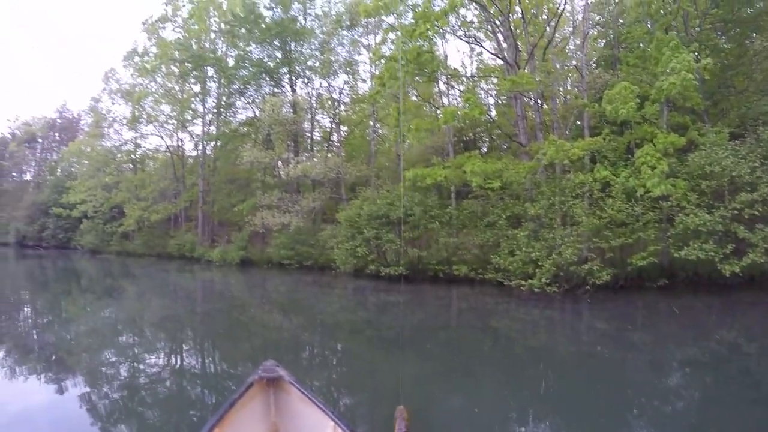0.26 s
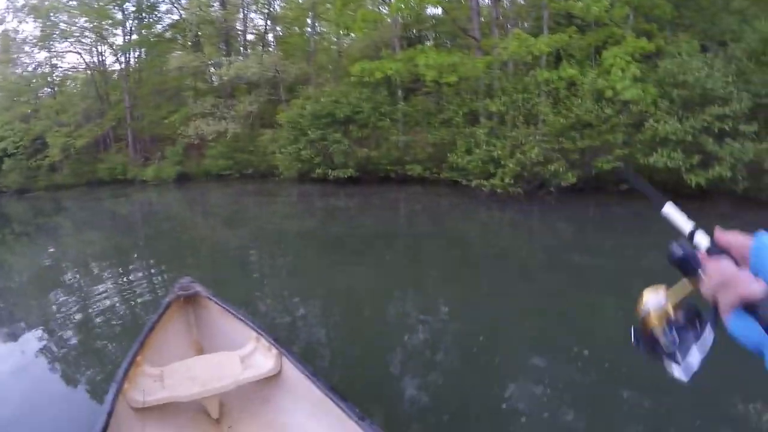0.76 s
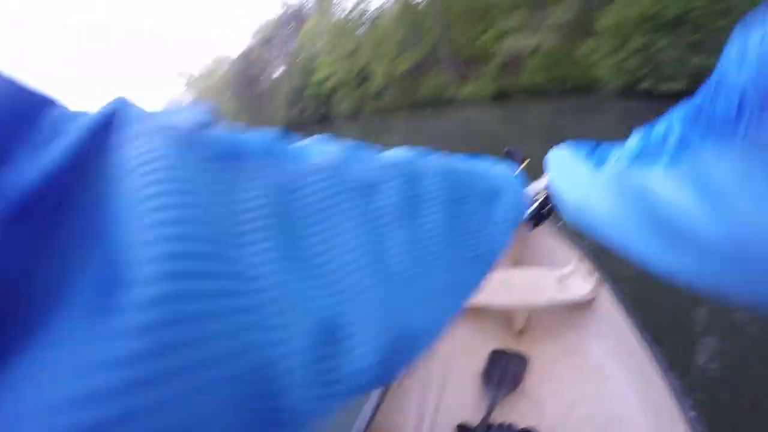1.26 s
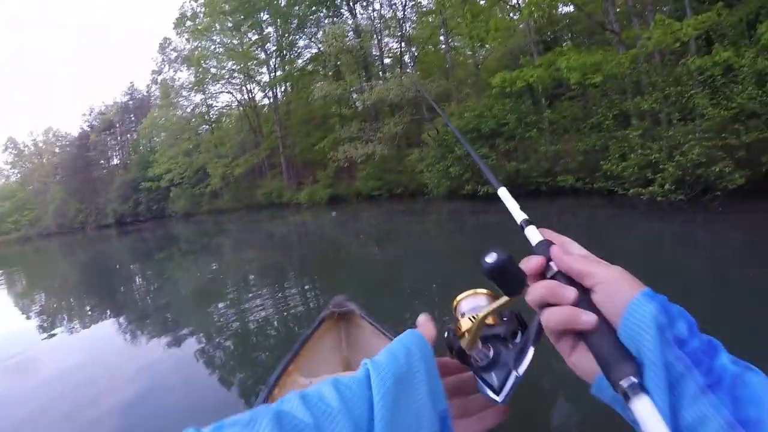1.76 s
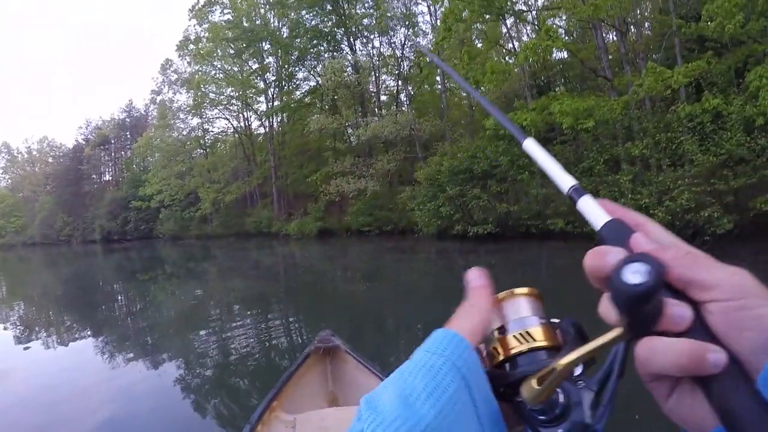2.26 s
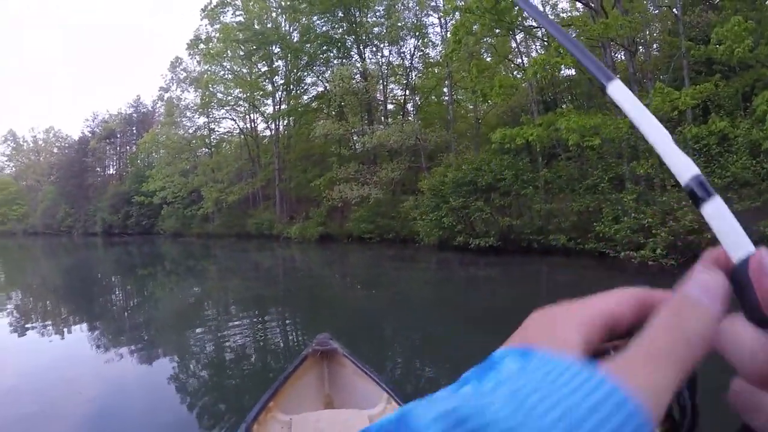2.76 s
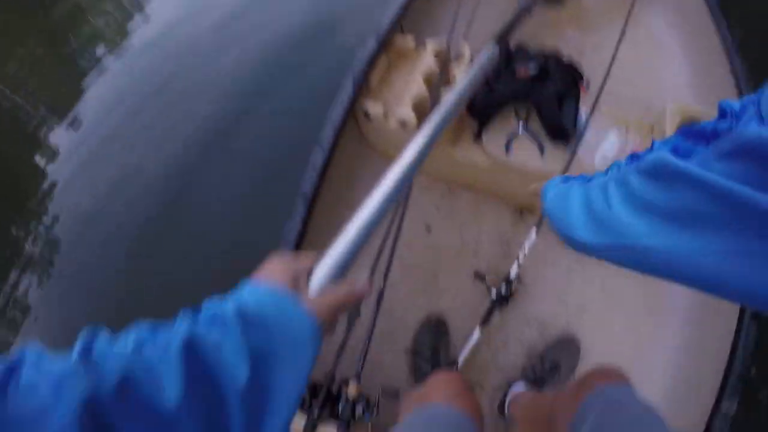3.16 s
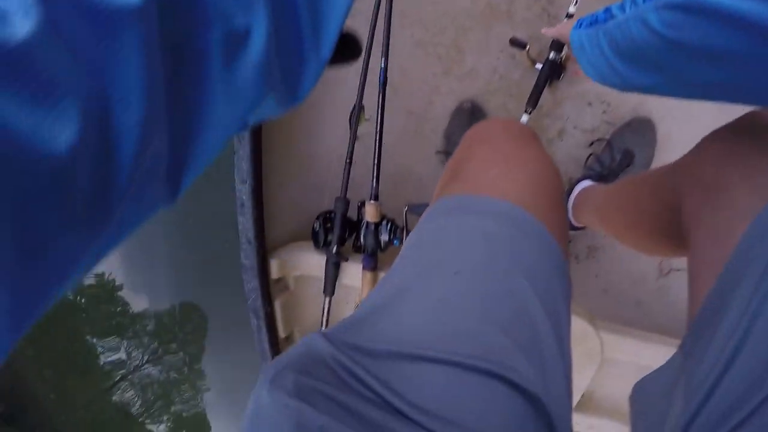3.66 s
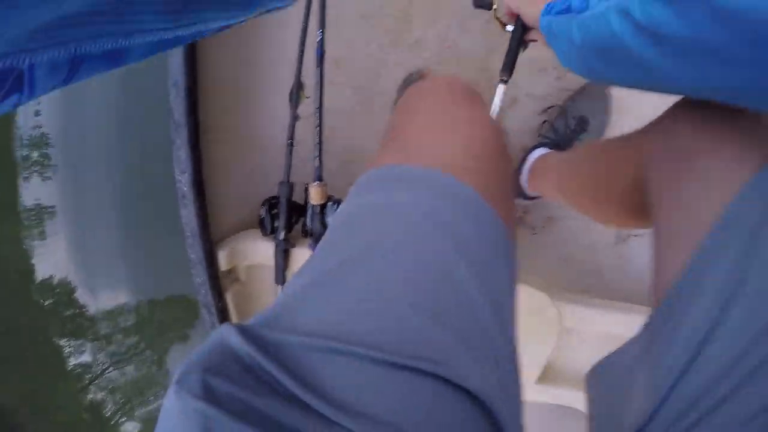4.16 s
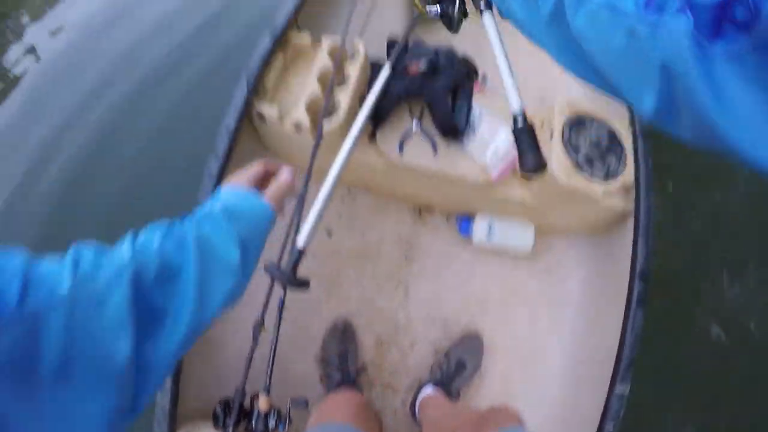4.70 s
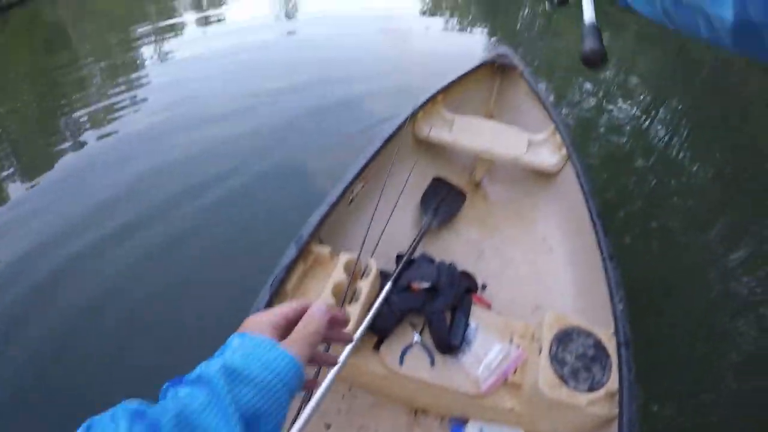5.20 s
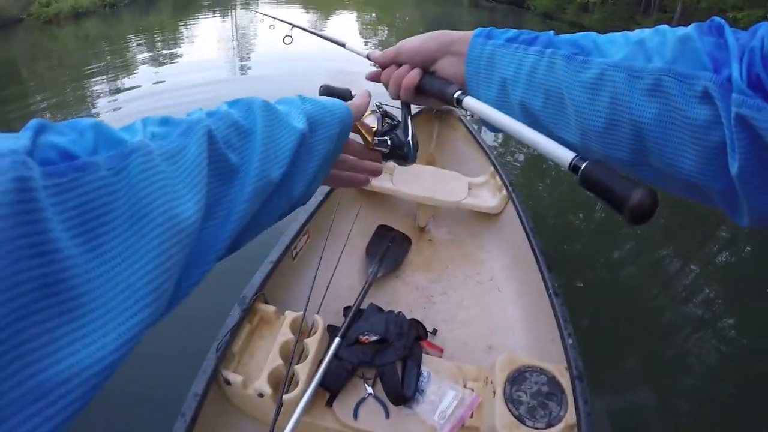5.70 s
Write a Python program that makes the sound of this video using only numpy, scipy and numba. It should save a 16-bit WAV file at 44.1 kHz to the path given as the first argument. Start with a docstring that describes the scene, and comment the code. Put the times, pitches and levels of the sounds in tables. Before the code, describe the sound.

Close at hand in a small boat on a still pond, a lure drips and gurgles, a rod whips through a short rustling cast, and line faintly fizzes off the spool. The reel bail then snaps shut with by far the loudest clack. A rod scrapes grittily along the seat and finally thumps the hull. A body-worn microphone catches low buffeting, faint water hiss and insects.

```python
"""The bail of a fishing reel snaps shut in a small boat on a still pond: noise cracks excite decaying modes.
Before it a lure drips (gliding sines), a rod is cast and line spills off the spool (swelling band noise).
After it a rod scrapes along the seat (noise through resonances) and knocks the hull (decaying modes).
A worn camera's microphone also hears air buffeting, faint pond hiss, tackle ticks, cloth rustle,
trilling insects and a far hum."""
import sys
import numpy as np
from scipy import signal
from scipy.fft import rfft, irfft
from scipy.io import wavfile
from scipy.ndimage import uniform_filter1d, map_coordinates
from numba import njit

SR = 44100
rng = np.random.default_rng(int(sys.argv[2]) if len(sys.argv) > 2 else 0)


def transcribe(u):
    """Save the signal u as a 16-bit wav file named by the first command-line argument.

    u: samples, shape (n,) or (channels, n), limited to [-1, 1]; the rate is SR.
    q: integer samples, one column per channel.
    """
    v = np.clip(np.atleast_2d(u).T, -1, 1)
    q = np.round(v * 32767).astype(np.int16)
    wavfile.write(sys.argv[1], SR, q)


N = 261943
T = np.arange(N) / SR  # time in seconds

# Swell tables: wherever a table is called a swell,
# each row: start of hold in seconds, gain in dB, rise, hold and fall in seconds.

# Surges of low rumble as the body moves, a swell.
SURGES = [(1.09, -31, 0.17, 0.11, 0.19), (3.62, -37, 0.11, 0.11, 0.31), (3.85, -43, .1, 0.31, 0.21),
          (4.63, -53, 0.27, .01, 0.32), (5.27, -36, 0.055, 0.053, 0.23)]
BREEZE_DB, BREEZE_SWING_DB = -54.5, 3
# Pond hiss spectrum. Each row: frequency in Hz, relative density in dB per Hz.
POND_SPECTRUM = [(35, -30.5), (60, -3.5), (207, -11), (338, -14), (398, -14), (458, -17), (1200, -24.5),
                 (3270, -27), (4320, -28.5), (5210, -31), (14200, -38.5), (16000, -53.5)]
POND_DB = -59
# Insect band level. Each row: time in seconds, gain in dB.
INSECT_LEVEL = [(0, -74), (2.1, -75.5), (3.3, -71.5), (5.94, -74)]

# Single bubbles and drops. Each row: start in seconds, peak in dB before flutter,
# start and end pitch in Hz, length in seconds.
BUBBLES = [(.004, -42.5, 395.6, 440, 0.0071), (.045, -51, 600, 680, 0.01), (0.074, -47.5, 570, 815, 0.032),
           (.088, -49, 1040, 1150, 0.025), (.115, -45.5, 1250, 1340, 0.013), (.128, -38, 436, 724, 0.035),
           (0.134, -40.5, 702, 980, 0.046), (0.207, -55, 500, 900, 0.006), (0.23, -50, 1340, 1440, 0.0071),
           (0.249, -37, 444, 620, 0.028), (0.26, -35.5, 603, 1315, 0.051), (0.364, -55, 1140, 1270, 0.035),
           (0.326, -50, 2970, 8000, 0.0044), (.329, -55, 3500, 6500, 0.0035),
           (0.3438, -38, 3820, 9300, 0.0042), (.348, -48, 4030, 8000, 0.004),
           (.416, -43, 3500, 11000, 0.0023), (0.45, -57, 4000, 11000, 0.0018)]
# Spray of tiny drops, a swell.
SPRAY = [(0.15, -47, 0.18, 0.084, 0.18), (.346, -68, .05, 0.0079, 0.041), (.4, -60, 0.061, 0.079, .03)]
# Gurgle of small bubbles, a swell.
GURGLE = [(0.13, -41, 0.23, 0.13, .2)]

# Small tackle ticks and rattles. Each row: start in seconds, peak of ring and crack in dB, ring pitch in Hz,
# treble crack against that peak in dB, decay time in seconds.
TICKS = [(0.041, -39.5, 3760, -1, 0.0088), (0.116, -39, 3050, -15, 0.01),
         (0.139, -34.5, 2830, -20.5, 0.0096), (0.2199, -44, 5050, -21, 0.013),
         (0.2655, -39, 2190, -1, 0.012), (1.175, -34, 3930, -24, 0.0047), (1.199, -47, 3870, -17, 0.0071),
         (1.255, -42, 2510, 6, 0.0087), (1.289, -55, 3850, -23, 0.0065), (1.312, -29.5, 4480, -33.5, 0.025),
         (1.328, -44, 4400, -24, 0.012), (1.513, -39.5, 5560, -2, 0.025), (1.814, -44, 5100, -5, 0.012),
         (1.937, -47, 2890, 8, 0.013), (1.954, -41.5, 2844, -5, 0.032), (2.038, -49, 2960, -18, 0.0093),
         (2.08, -41, 2000, -33, 0.01), (2.111, -41.5, 2300, -23, 0.016), (2.657, -38.5, 2820, -12, 0.018),
         (2.6743, -36, 3630, -16, 0.0054), (2.678, -36, 2600, -26, 0.0039), (3.77, -42, 2630, -11, 0.011),
         (3.788, -46, 4500, 8, 0.0054), (3.855, -46, 4600, 5, 0.0072), (3.942, -33, 1800, -22.5, 0.0057),
         (4.021, -33, 3430, -27, 0.0092), (4.14, -38, 3340, -4, 0.014), (4.187, -45.5, 4800, -5, 0.0083),
         (4.35, -46.5, 4040, -4, 0.01), (5.692, -39, 5500, -3.5, 0.017), (5.696, -36.5, 2140, -21, 0.0063),
         (5.7428, -42, 4480, -10, 0.0055), (5.8194, -36.5, 3022, -2.5, 0.0039),
         (5.823, -43.5, 2200, -18, 0.016), (5.8304, -46, 2290, -18.5, 0.014),
         (5.907, -43.5, 4210, -1.5, 0.0068), (5.9334, -36.5, 3640, -27, 0.022)]
# Soft cloth and hand noise, low and high, both swells.
LOW_RUSTLE = [(.58, -61.5, 0.3, 0.16, 0.3), (2.45, -62.5, 0.36, 0.45, 0.83), (4.5, -69.5, 0.64, 0.35, 0.58),
              (5.4, -71, 0.25, 0.011, .2)]
HIGH_RUSTLE = [(2.55, -68.5, .4, 0.026, .8), (2.88, -71.5, 0.071, 0.044, .3), (4.35, -69, .2, .5, .4)]

# Reel parts snapping. Each row: start in seconds, peak in dB, ring gain in dB,
# crack decay in seconds, low clack gain in dB.
SNAPS = [(0.4745, -26, -6.5, 0.01, -47), (2.5817, -12.5, 4, 0.022, -34.5), (2.6, -24.5, -13.5, 0.015, -13),
         (2.6062, -31, -9.5, 0.01, -7.5), (2.6108, -13, -17, 0.018, -18.5), (2.615, -1, -7.5, 0.012, -14.5),
         (2.617, -7.5, 6, 0.011, -1), (2.6199, -2, -6.5, 0.014, -28.5), (2.626, -18, -22, 0.014, -8),
         (2.633, -18.5, -2, 0.0083, -4), (2.635, -24, -8.5, 0.0072, 1.5)]
# Modes of the reel body. Each row: frequency in Hz, gain in dB, decay time in seconds.
REEL_MODES = [(1980, -20.5, .025), (3480, -8, .012), (4390, -13.5, 0.024), (4880, 6, 0.012),
              (6600, -17, 0.0085), (7700, -7, 0.011), (13410, -7, .005)]

# Jerks of rod and sleeves in the cast. Each row: start of hold in seconds, hiss gain in dB,
# rise, hold and fall in seconds, low swish gain in dB, fine rustle gain in dB.
CAST_JERKS = [(.72, -70, 0.18, 0.054, 0.075, -67, -95), (0.993, -60, 0.065, .005, 0.23, -59.5, -71),
              (1.085, -62, 0.032, 0.0021, 0.12, -45.5, -62),
              (1.143, -26.5, 0.011, 0.0078, 0.051, -38, -49.5), (1.209, -49, 0.033, .01, 0.073, -50, -59),
              (1.263, -45.5, 0.037, 0.0093, .05, -48.5, -53.5), (1.295, -51, 0.05, 0.023, 0.17, -54.5, -66)]
CAST_HZ = 4450  # rod-tip hiss resonance

# Coils fizzing over the spool lip, a swell.
SPOOL_FIZZ = [(1.72, -55, 0.61, .03, 0.25)]
# Line buzzing in the rod guides, a swell.
GUIDE_BUZZ = [(1.52, -56, 0.13, 0.11, 0.25), (1.81, -53.5, 0.081, 0.016, 0.097),
              (1.89, -60, 0.085, 0.088, 0.093)]
# Line singing in the guides, a swell.
WHISTLE = [(1.55, -66, .1, .13, .12), (1.87, -73, .05, .03, .08)]
# Its pitch curve: times in seconds, resonances in Hz.
WHISTLE_S = (1.6, 1.72, 2.2)
WHISTLE_HZ = (3020, 2550, 2830)
# A sleeve brushing, a swell.
SLEEVE = [(1.45, -55.5, 0.32, 0.17, .45)]

# Blows on the hull. Each row: start in seconds, gain in dB, crack against that gain in dB,
# contact time in seconds, decay-time factor, gain of the low modes in dB.
KNOCKS = [(1.39, -50.5, -20, 0.0017, 0.92, 0.), (1.728, -45, -20, 0.0011, 0.39, 3),
          (3.56, -51, 2, .0003, .4, -8), (3.5622, -36.5, 13, 0.00024, 0.49, -12),
          (3.574, -38.5, -1, 0.00033, 0.69, -4), (3.592, -38, -15, .002, 1.1, -10),
          (3.612, -41, -3, 0.002, 1.1, -8), (5.249, -27.5, 4, 0.00019, 0.76, 0.5),
          (5.277, -26, -22, 0.0032, 0.95, -2), (5.312, -30.5, -26, 0.0031, 0.45, 0.),
          (5.347, -48, -13, 0.00093, 0.55, 4)]
# Modes of the hull. Each row: frequency in Hz, gain in dB, decay time in seconds at factor 1.
HULL_MODES = [(54.3, -41, 0.11), (126, -43, 0.21), (183.6, -8.5, 0.35), (219.6, 0, 0.14), (278.6, 2, 0.08),
              (337.5, -17.5, 0.44), (403, 6.5, 0.064), (561, 2, 0.14), (692, 0.5, 0.13), (862, 0, 0.0937),
              (1030, -11, 0.13), (1590, -10, 0.02), (2200, -50, .05), (2970, -24, 0.0082)]
LOW_MODES_HZ = 250  # blows near the seat stir the modes under this less

# Far hum, a swell.
HUM = [(1.9, -60, .2, .92, .12)]
HUM_HZ = 153
# Near insect, a swell.
TRILL = [(3.0, -74.5, .1, 0.55, .3), (5.35, -76, .3, .6, .1)]
TRILL_PER_S, TRILL_HZ, TRILL_FALL_HZ = 36.5, 4600, 700  # each pulse slides down in pitch

# Rod dragged along seat and hull, one curve a stroke. Each row: time in seconds, hull rumble gain in dB,
# surface fizz gain in dB, rod resonance in Hz.
DRAG_STROKES = [
    [(3.594, -47, -61, 630), (3.61, -37.5, -66, 656), (3.62, -48, -75, 670)],
    [(3.667, -43.5, -63, 840), (3.746, -40, -61, 647), (3.862, -44.5, -57.5, 750),
     (3.924, -50.5, -55.5, 784), (3.948, -37.5, -62, 850), (3.982, -48.5, -67, 812), (4.022, -38, -62, 855),
     (4.112, -45, -74, 840), (4.146, -45, -72, 700), (4.18, -50.5, -82, 662), (4.32, -76, -80, 720)],
    [(4.9, -84, -71, 781), (4.96, -71, -72, 711), (5.1, -63, -74.5, 693), (5.2, -61.5, -69.5, 810),
     (5.248, -62, -59, 630)],
]
# Surface fizz spectrum. Each row: frequency in Hz, relative density in dB per Hz.
FIZZ_SPECTRUM = [(5000, -9), (7000, -4), (9000, -2.5), (10500, -5), (12500, -3), (14500, -1), (16000, -6)]
# Grit spectrum. Each row: frequency in Hz, relative density in dB per Hz.
GRIT_SPECTRUM = [(710, -61), (1200, -25), (1560, 4.5), (1780, -4), (2080, 0.5), (2550, 3), (2740, -1),
                 (4740, -6.5), (8000, -42), (10400, -47.5), (17600, -120)]
GRIT_OVER_DB = 3.5  # grit gain above the mean of rumble and fizz gains
GRIT_FLICKER_DB = 2.2
# The free length of rod shortens and its hiss climbs: times in seconds, resonances in Hz.
SWEEP_S = (3.4, 4.05)
SWEEP_HZ = (2240, 5460)
# The fizz turns abruptly duller partway through the scrape: the second time in seconds is the switch,
# the first is unused; resonances before and after in Hz.
DULLER_S = (3.86, 3.83)
DULLER_HZ = (12100, 7500)

# The rod blank sings after the blow: start in seconds, peak in dB, pitch in Hz, decay time in seconds.
ROD_RING = (5.256, -60, 5850, .2)
TOP_HZ = 15400  # recorder cut-off


def undb(db):
    """Level law: dB to amplitude gain."""
    return 10 ** (np.asarray(db) / 20)


def unit(x):
    """Normalization: scale to rms 1."""
    return x / np.sqrt(np.mean(x ** 2))


def gains(table, fade=0.058):
    """Linear interpolation of a curve's columns, with a gate that fades within fade s beyond its ends."""
    s, *columns = np.transpose(table)
    gate = np.clip(np.minimum(T - s[0], s[-1] - T) / fade + 1, 0, 1)
    return gate, [np.interp(T, s, c) for c in columns]


def swell(s, db, rise, hold, fall):
    """Exponential envelope: climbs 20 dB in rise s to db at time s, holds, then drops 20 dB in fall s."""
    before = (s - T) / max(rise, .002)
    after = (T - s - hold) / max(fall, .002)
    return undb(db - 20 * np.maximum(np.maximum(before, after), 0))


def swells(rows):
    """Power summation: several swells of one noise add in power."""
    return np.sqrt(sum(swell(*row) ** 2 for row in rows))


@njit
def svf(x, hz, q):
    """State-variable resonance: a band-pass whose centre may move, gain 1 at the centre."""
    y, b, l = np.empty(len(x)), 0., 0.
    for i in range(len(x)):
        g = np.tan(np.pi * hz[i] / SR)
        v = (b + g * (x[i] - l)) / (1 + g * (g + 1 / q))
        b, l, y[i] = 2 * v - b, l + 2 * g * v, v / q
    return y


def band_pass(x, lo_hz, hi_hz, order=2):
    """Band limitation by a Butterworth filter."""
    return signal.sosfilt(signal.butter(order, [lo_hz, hi_hz], "band", fs=SR, output="sos"), x)


def band(lo_hz, hi_hz, grain_db=0., order=2):
    """Band-limited noise of rms 1; grain_db makes it of uneven particles."""
    particles = np.minimum(rng.exponential(size=N), 5)
    return unit(band_pass(rng.standard_normal(N) * undb(grain_db * particles), lo_hz, min(hi_hz, .45 * SR), order))


def walk(rate):
    """Slow random modulation: levels held 1 / rate s and smoothed twice, with a spread near 1."""
    k = int(SR / rate)
    held = np.repeat(rng.standard_normal(N // k + 1), k)
    return 1.3 * uniform_filter1d(uniform_filter1d(held, k), k)[:N]


def coloured(spectrum, flicker_db, rate):
    """Spectral shaping: overlapping noise bands 0.43 octave apart, each flickering on its own; rms 1."""
    hz, db = np.transpose(spectrum)
    log_hz = np.log(np.arange(N // 2 + 1) * SR / N + 1)
    shaped = rfft(rng.standard_normal(N)) * undb(np.interp(log_hz, np.log(hz), db, -120, -120))
    out = 0
    for centre in np.arange(np.log(hz[0]), np.log(hz[-1]) + .3, .3):
        triangle = np.clip(1 - abs(log_hz - centre) / .3, 0, 1)
        out = out + irfft(shaped * triangle, N) * undb(flicker_db * walk(rate))
    return unit(out)


def add(out, s, x, db):
    """Superposition: place x at time s with its peak at db."""
    i = int(s * SR)
    out[i:i + len(x)] += (x * undb(db) / abs(x).max())[:N - i]


def ring(modes, t, stretch=1., spread=0.):
    """Modal decay by 56 dB in each decay time; strikes vary, and spread delays low modes more on average."""
    chance = rng.standard_normal((len(modes), 3))
    out = 0
    for (hz, db, decay), (level, detune, delay) in zip(modes, chance):
        late = np.maximum(t - spread * abs(delay) / hz, 0)
        tone = np.sin(2 * np.pi * hz * (1 + 0.0089 * detune) * late)
        out = out + undb(db + 0.38 * level) * tone * 0.0015 ** (late / (decay * stretch))
    return out


def crack(t, lo_hz, hi_hz, t60):
    """Impulsive noise: a burst decaying 60 dB in t60 (at least 2 ms), then band-passed to peak 1."""
    x = band_pass(rng.standard_normal(len(t)) * 1e-3 ** (t / max(t60, .002)), lo_hz, hi_hz)
    return x / abs(x).max()


def bubble(length, a_hz, b_hz):
    """Bubble resonance: a sine of length samples gliding in pitch under a soft hump."""
    u = np.linspace(0, 1, length)
    return np.sin(np.pi * u ** 0.71) * np.sin(2 * np.pi * np.cumsum(a_hz * (b_hz / a_hz) ** u) / SR)


def buffeting():
    """Turbulent pressure on the microphone: very low noise driven by breeze and body surges."""
    push = np.hypot(undb(BREEZE_DB + BREEZE_SWING_DB * walk(8)), swells(SURGES))
    return push * undb(1.5 * walk(22)) * band(7.9, 54)


def pond():
    """Diffuse ambience: steady coloured noise as pond hiss."""
    return undb(POND_DB) * coloured(POND_SPECTRUM, 0.23, 8.1)


def insects():
    """Many incoherent insects merge into a fluctuating noise band."""
    return undb(gains(INSECT_LEVEL)[1][0] + 2 * walk(18)) * band(3700, 4700)


def water():
    """Bubble resonance: pitch glides up near the surface; spray and gurgle are dense runs of small ones."""
    single, drops, small = np.zeros(N), np.zeros(N), np.zeros(N)
    for s, db, a_hz, b_hz, length in BUBBLES:
        add(single, s, bubble(int(length * SR), a_hz, b_hz), db)
    for s, pitch, size in rng.random((400, 3)):
        hz = 2200 * 4 ** pitch
        add(drops, .5 * s, bubble(int(6 * SR / hz), hz, 1.48 * hz), -20 * size)
    for s, pitch, size in rng.random((60, 3)):
        hz = 450 * 3.5 ** pitch
        add(small, .5 * s, bubble(int(12 * SR / hz), hz, 1.19 * hz), -14 * size)
    splash = 0.48 * undb(5.4 * walk(80.3)) * band(1700, 5330, 1.9, order=1)
    mist = 0.14 * undb(6.7 * walk(117.7)) * band(7000, 17000, 10.0)
    spray = swells(SPRAY) * (2.03 * drops + splash + mist)
    gurgle = swells(GURGLE) * (0.7 * small + 0.27 * band(380, 1300))
    flutter = undb(3.3 * walk(220.2))
    return flutter * single + spray + gurgle


def tackle():
    """Impact of small parts: each tick rings at its own pitch inside a short crack."""
    out, t = np.zeros(N), T[:SR // 20]
    for s, db, hz, treble_db, decay in TICKS:
        ring_gain = .3 if s > 5.5 else 1  # the last ticks are damped by the hand
        add(out, s, ring_gain * ring([(hz, 0, decay)], t) + 0.75 * crack(t, 0.41 * hz, 1.5 * hz, decay), db)
        add(out, s, crack(t, 5000, 14000, 0.93 * decay), db + treble_db)
    return out


def rustle():
    """Friction of cloth and hands: soft band noise between the louder moves."""
    low = swells(LOW_RUSTLE) * undb(2 * walk(5.2)) * band(280, 1200)
    high = swells(HIGH_RUSTLE) * undb(2 * walk(6.3)) * band(1600, 3300)
    return low + high


def reel():
    """Impact and modal ringing: bail wire and spring give a crack, the reel body's ring and a duller clack."""
    out, t = np.zeros(N), T[:SR // 10]
    for s, db, ring_db, t60, clack_db in SNAPS:
        edge = crack(t, 3000, 7760, t60) + 0.68 * crack(t, 8000, 16000, 1.1 * t60)
        clack = 1.4 * crack(t, 1950, 2500, 0.016) + .4 * crack(t, 2500, 3600, 0.013)
        clack = clack + 0.5 * crack(t, 150, 1200, 0.07)
        body = ring(REEL_MODES, t, spread=1.7)
        add(out, s, edge + undb(ring_db) * body + undb(clack_db) * clack, db)
    return out


def cast():
    """Aerodynamic and friction noise: the rod tip hisses through a resonance, sleeves swish and crackle."""
    wide, low, fine = band(1940, 6000, 5.7), band(190, 1500, order=1), band(4600, 17000, 3.4)
    hz = np.full(N, 1. * CAST_HZ)
    hiss = 0.28 * unit(svf(svf(wide, hz, 1.1), hz, 1.1)) + 0.18 * wide
    tip = swells((s, db, *shape) for s, db, *shape, _, _ in CAST_JERKS)
    swish = swells((s, db, *shape) for s, _, *shape, db, _ in CAST_JERKS)
    crisp = swells((s, db, *shape) for s, _, *shape, _, db in CAST_JERKS)
    crackle = undb(4.6 * walk(220))
    return crackle * (tip * hiss + crisp * fine) + swish * undb(2 * walk(39.7)) * low


def line():
    """Friction of running line: coils fizz over the spool lip, buzz and whistle in the guides; a sleeve brushes."""
    fizz = swells(SPOOL_FIZZ) * undb(1.5 * walk(29.2)) * band(11140, 17000)
    buzz = 0.25 * band(7300, 9000) + 0.68 * band(1700, 8000, 5.6, order=1)
    buzz = swells(GUIDE_BUZZ) * undb(0.81 * walk(48.9)) * buzz
    whistle = unit(svf(band(1600, 2900), np.interp(T, WHISTLE_S, WHISTLE_HZ), 12.0))
    whistle = swells(WHISTLE) * undb(1.8 * walk(29.7)) * whistle
    sleeve = swells(SLEEVE) * undb(2 * walk(39.4)) * band(190, 750, order=1)
    return fizz + buzz + whistle + sleeve


def hull():
    """Modal excitation: a soft push rings paired hull modes, lows tending to come last; a hard edge cracks."""
    out, t = np.zeros(N), T[:SR // 2]
    pairs = HULL_MODES + [(1.07 * hz, db - 3, .8 * decay) for hz, db, decay in HULL_MODES]
    for s, db, crack_db, contact, stretch, low_db in KNOCKS:
        struck = [(hz, mode_db + low_db * (hz < LOW_MODES_HZ), decay) for hz, mode_db, decay in pairs]
        # a longer contact smooths the blow and so dulls it
        push = np.hanning(int(max(contact, 1e-4) * SR) + 3)
        thud = np.convolve(ring(struck, t, stretch, spread=1.23), push / push.sum())[:len(t)]
        add(out, s, thud, db + 20 * np.log10(abs(thud).max()))  # keeps the thud's own peak
        add(out, s, crack(t, 2820, 4670, 0.011) + 0.58 * crack(t, 1220, 2840, 0.074), db + crack_db)
    return out


def hum():
    """Tonal source: a far sine whose pitch and level waver slightly."""
    tone = np.sin(2 * np.pi * np.cumsum(HUM_HZ * (1 + .004 * walk(4))) / SR)
    return swells(HUM) * undb(1.5 * walk(5)) * tone


def cricket():
    """Pulse-modulated tone: a near insect trills in short falling pulses at a nearly even rate."""
    phase = np.cumsum(TRILL_PER_S * (1 + .03 * walk(5))) / SR % 1
    pulse = np.sin(np.pi * np.minimum(phase / .55, 1)) ** 2
    tone = np.sin(2 * np.pi * np.cumsum(TRILL_HZ - TRILL_FALL_HZ * phase) / SR)
    return swells(TRILL) * undb(2 * walk(14)) * 2 * pulse * tone


def drag():
    """Stick-slip friction: uneven grains drive hull modes, a moving rod resonance and a gritty surface hiss."""
    slip = undb(1.47 * walk(120))
    grains = band(133, 1070, 2.4, order=1)
    # friction damps the modes, so they are wider than after a blow
    body = unit(sum(undb(db) * svf(grains, np.full(N, 1. * hz), max(0.13 * hz * decay, 1.))
                    for hz, db, decay in HULL_MODES[4:]))
    grit = 0.99 * coloured(GRIT_SPECTRUM, GRIT_FLICKER_DB, 8) + .5 * band(1480, 6200, 2.5)
    fizz = coloured(FIZZ_SPECTRUM, 3.5, 9) * undb(2 * walk(300))
    # the hull floor throws the grit back a moment later; the shifting path combs it into drifting streaks
    lag = SR * (.0022 + 0.000396 * walk(9))
    echo = map_coordinates(grit, [np.arange(N) - lag], order=1)
    sweep = np.interp(T, SWEEP_S, SWEEP_HZ)
    rasp = 0.16 * unit(svf(grit, sweep, 8.8)) + 0.76 * (grit + 0.17 * echo)
    # the surface fizz resonates at one bright pitch, then jumps to a duller one
    surface_hz = 1. * np.where(T > DULLER_S[1], DULLER_HZ[1], DULLER_HZ[0])
    hiss = 0.68 * fizz + 0.48 * unit(svf(fizz, surface_hz, 1.9))
    out = 0
    for stroke in DRAG_STROKES:
        gate, (body_db, fizz_db, rod_hz) = gains(stroke, 0.003)
        grit_db = (body_db + fizz_db) / 2 + GRIT_OVER_DB
        wood = 0.64 * body + 0.39 * unit(svf(grains, rod_hz, 3.6))
        out = out + gate * slip * (undb(body_db) * wood + undb(grit_db) * rasp + undb(fizz_db) * hiss)
    return out


def rod_ring():
    """Free vibration: one decaying mode of the rod blank."""
    out = np.zeros(N)
    s, db, hz, decay = ROD_RING
    add(out, s, ring([(hz, 0, decay)], T[:SR // 2]), db)
    return out


def scene():
    """Superposition in open air; hull and water throw back a short scatter of the reel and tackle clicks."""
    clicks = reel() + tackle()
    scatter = signal.fftconvolve(clicks, undb(-38.5) * crack(T[:SR // 8], 1000, 12000, .07))[:N]
    ambience = buffeting() + pond() + insects() + hum() + cricket()
    handling = water() + rustle() + cast() + line() + hull() + drag() + rod_ring()
    return (clicks + scatter + ambience + handling)[None]


def record(dry):
    """Low-pass filtering: the camera housing dulls the highest treble and the recorder cuts the top."""
    dull = signal.sosfilt(signal.butter(2, 15500, fs=SR, output="sos"), dry)
    return signal.sosfilt(signal.ellip(10, .2, 90, TOP_HZ, fs=SR, output="sos"), dull)


dry = scene()
out = record(dry)
transcribe(out)
```